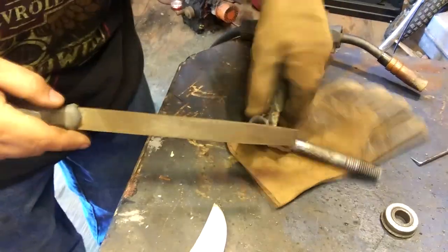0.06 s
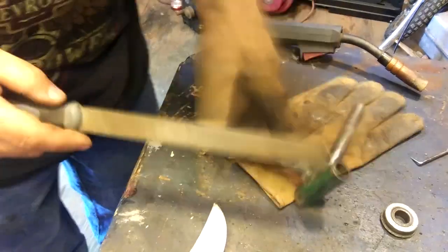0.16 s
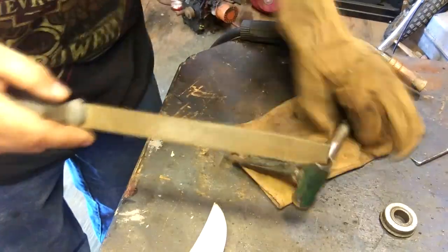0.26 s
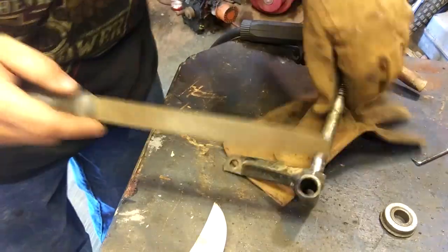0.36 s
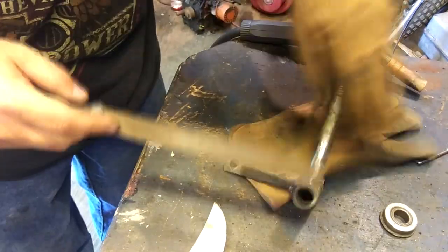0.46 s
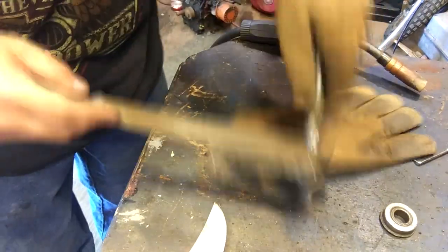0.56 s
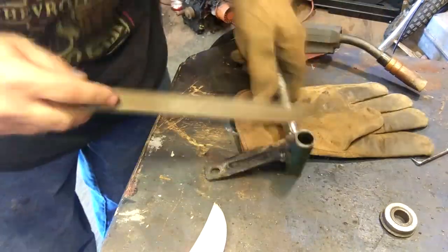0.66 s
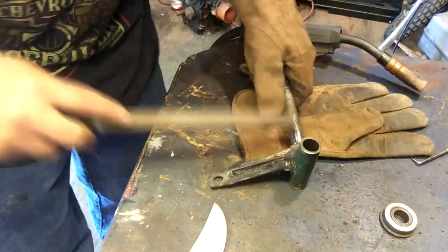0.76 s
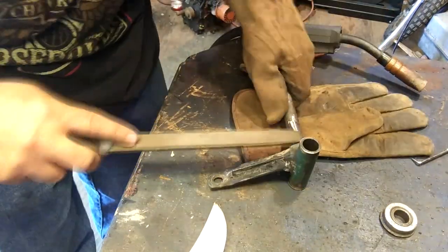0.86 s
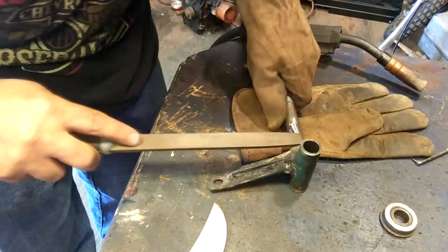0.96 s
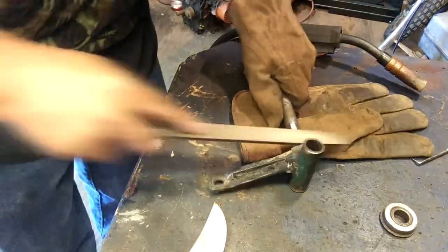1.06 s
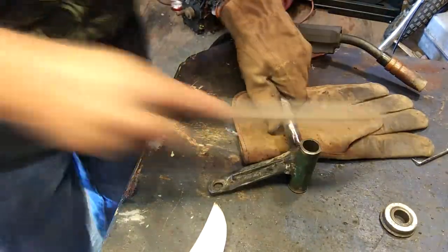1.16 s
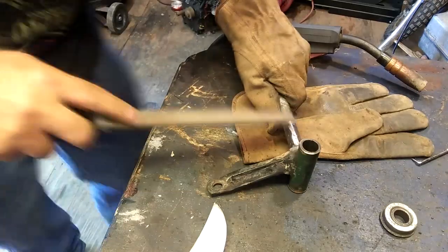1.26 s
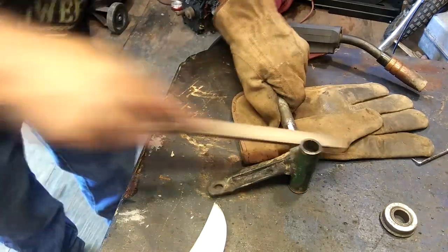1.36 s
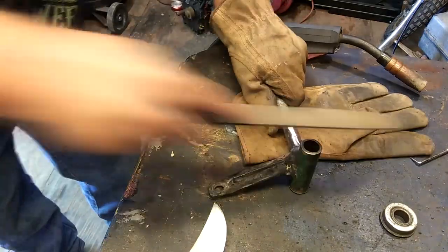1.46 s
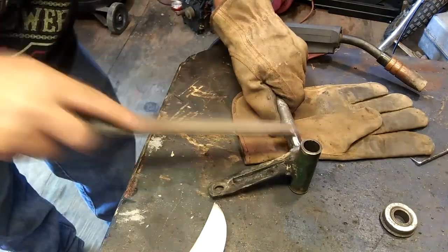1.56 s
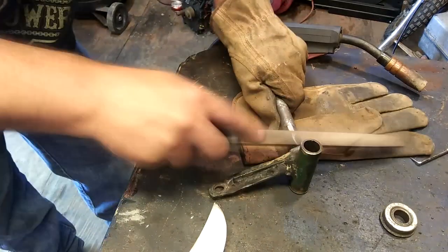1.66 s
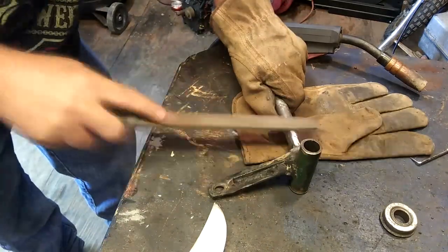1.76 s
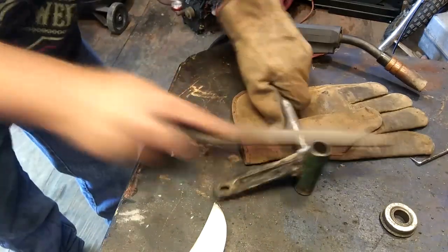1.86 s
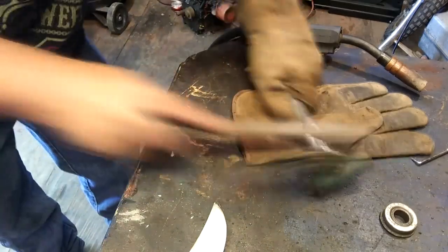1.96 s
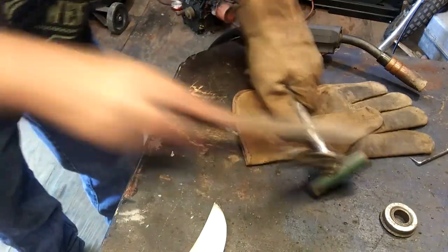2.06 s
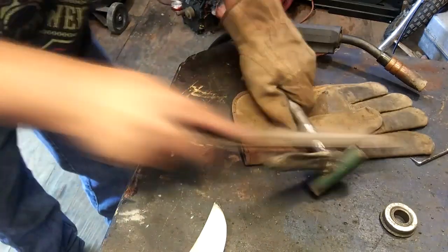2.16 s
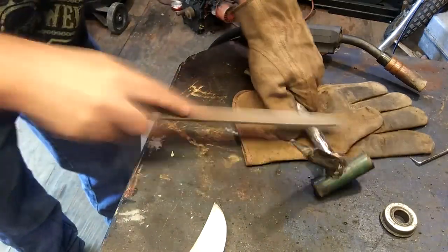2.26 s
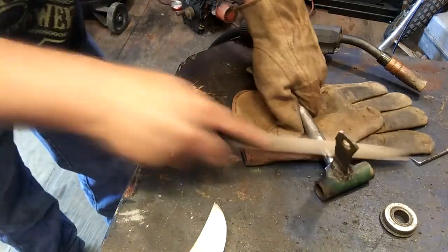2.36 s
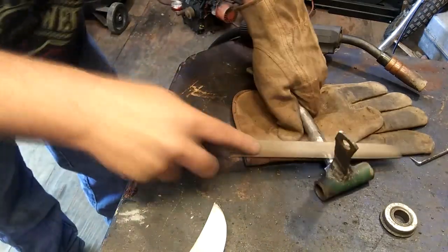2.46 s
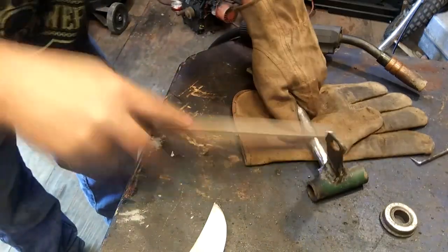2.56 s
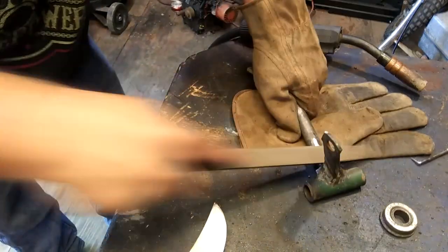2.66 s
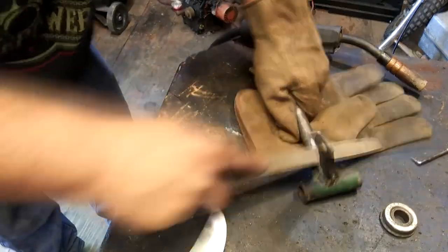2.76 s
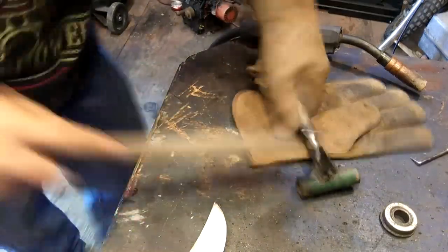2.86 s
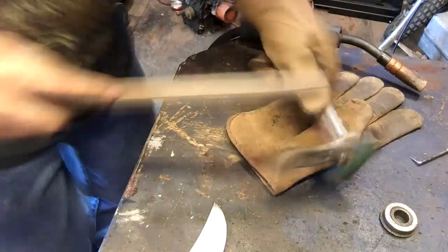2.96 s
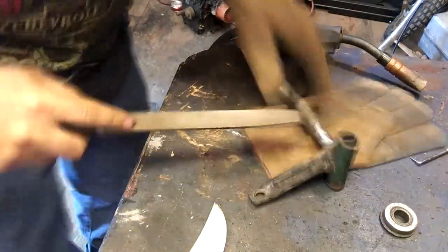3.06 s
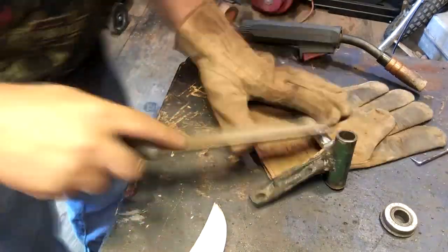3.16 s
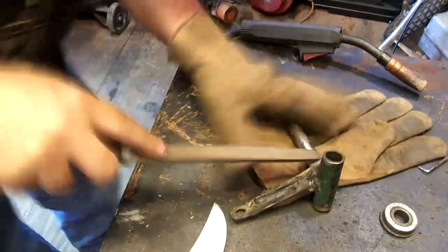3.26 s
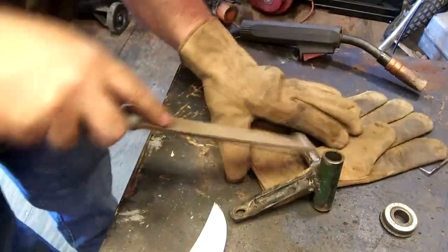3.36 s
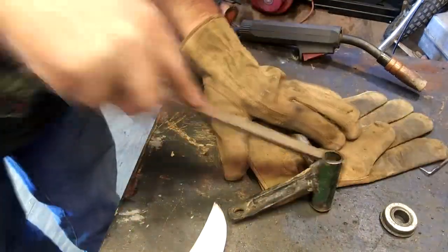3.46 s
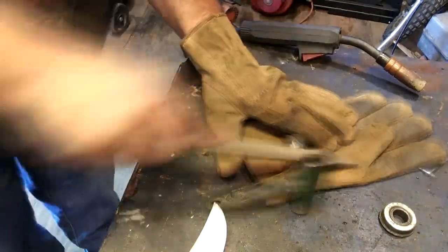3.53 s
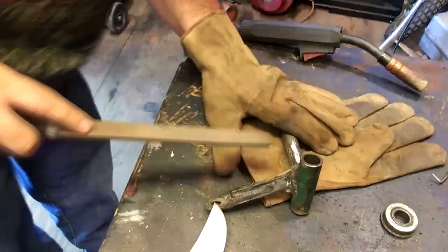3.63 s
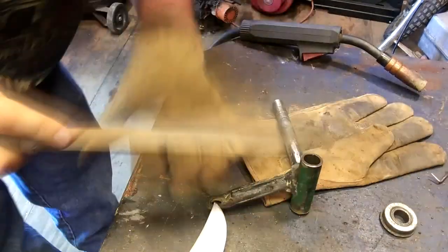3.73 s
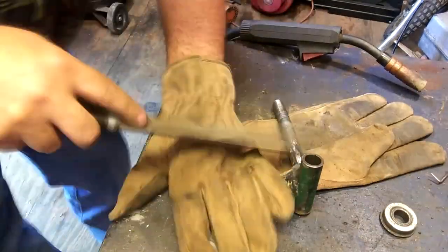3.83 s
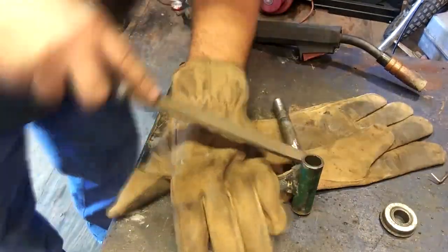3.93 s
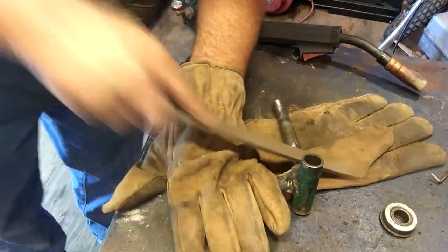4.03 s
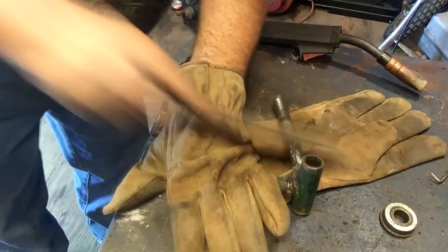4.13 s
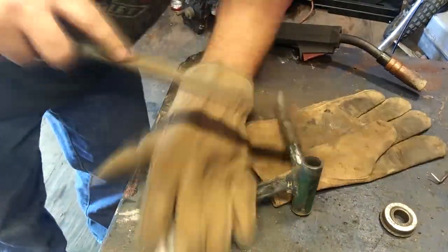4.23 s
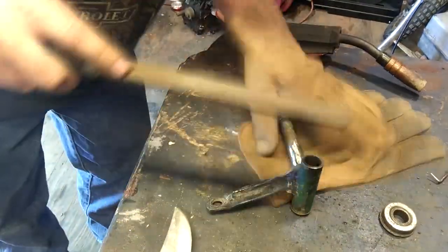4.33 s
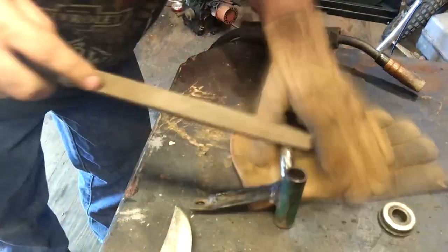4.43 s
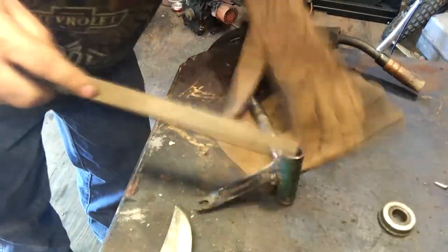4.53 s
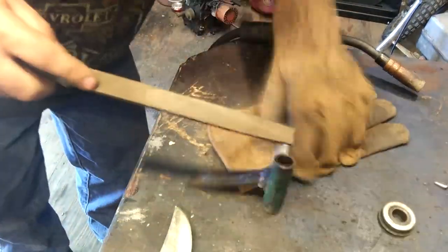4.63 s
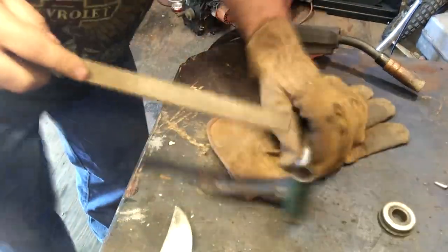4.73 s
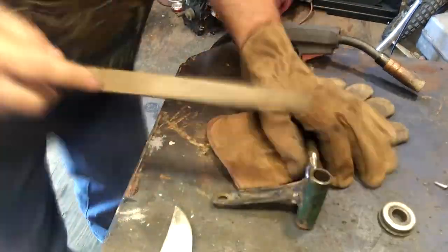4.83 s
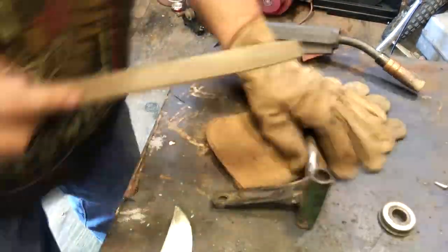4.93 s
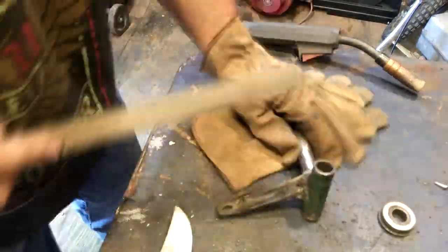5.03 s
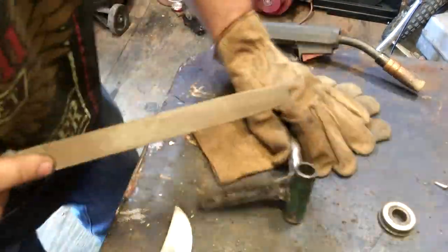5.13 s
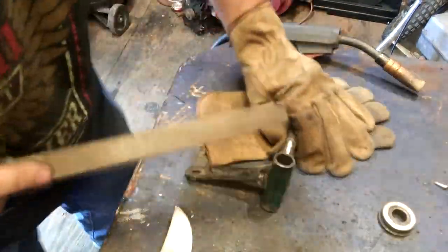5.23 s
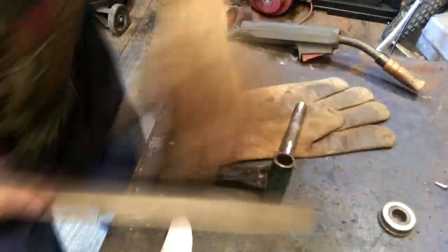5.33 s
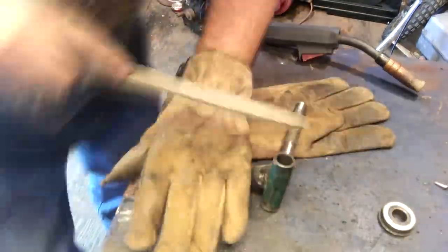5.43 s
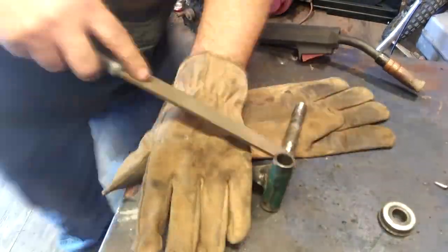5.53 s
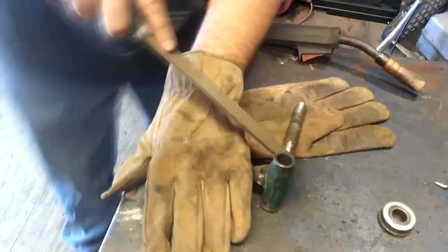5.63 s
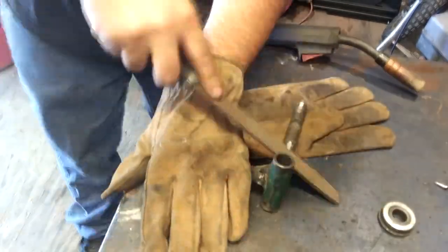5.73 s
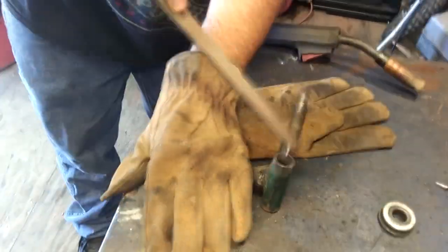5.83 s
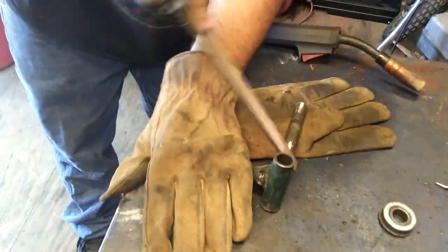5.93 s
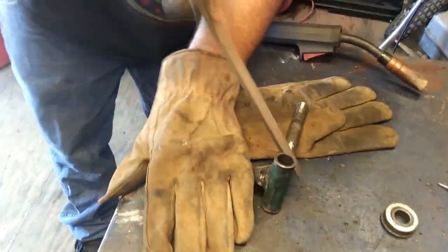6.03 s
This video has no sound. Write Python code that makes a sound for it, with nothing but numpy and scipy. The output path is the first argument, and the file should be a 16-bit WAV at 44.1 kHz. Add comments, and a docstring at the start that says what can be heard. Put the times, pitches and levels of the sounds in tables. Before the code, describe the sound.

Close mono sound of hand filing at a workbench. Hard set-downs come first, then gritty, hollow rasping with mid-range bench resonance and thin steel ring, speckled with bright clicks as teeth catch. The strokes pause for handling, return in short pairs, give way to soft scuffs and a dull knock, then a last few rasps. Quiet room, faint steady air, almost no bass.

```python
"""Hand filing of small steel part

A flat file rasps in quick, uneven strokes over a small steel part held on a gloved bench top.
Jerky tooth-slip noise drives resonances of bench, part, blade and teeth in each stroke, scuff and set-down.
Noise bursts make single tooth ticks; sines make deep thuds and faint steel rings; shaped noise is room tone.
Close mono microphone with little bass, in a quiet workshop."""
import sys
import numpy as np
from scipy import signal
from scipy.fft import rfft, irfft, next_fast_len
from scipy.io import wavfile
from scipy.ndimage import uniform_filter1d, map_coordinates

SR = 44100
rng = np.random.default_rng(int(sys.argv[2]) if len(sys.argv) > 2 else 0)


def dump(signal):
    """Clip the signal to [-1, 1] and save it as 16-bit WAV at the path in sys.argv[1]."""
    limited = np.clip(np.atleast_2d(signal).T, -1, 1)
    pcm = np.round(limited * 32767).astype(np.int16)
    wavfile.write(sys.argv[1], SR, pcm)


N = 268392  # samples
PAD = 32768  # samples of margin at each end

# Room tone spectrum: hz, relative_density_db
AIR_SPECTRUM = [(18, -49), (30, -31), (130, -17), (230, -18), (450, -11), (900, -3.5), (1100, -7),
                (3600, -19), (10200, -28.5), (15700, -30)]
# Part set down hard: peak_s, rise_ms, fall_ms, bench_db, bench_favoured_hz, thud_db
KNOCKS = [(.001, 16, 32.2, -15.5, 723, -58), (0.1723, 2.7, 37.7, -23.5, 696, -43),
          (.186, 4.8, 18, -16.5, 830, -79), (0.646, 4, 30.8, -17.5, 830, -43),
          (3.017, 6.5, 25, -15, 846, -43), (4.801, 8.8, 13, -18.5, 825, -32.5)]
# Faint thin rings of loose steel: peak_s, pitch_hz, level_db, rise_ms
RINGS = [(.015, 5310, -41, 22), (.362, 4300, -60, 13), (.515, 6050, -66, 25), (3.937, 1330, -35, 12)]
# Part scuffed and bumped over the glove: peak_s, rise_ms, fall_ms, bench_db, bench_favoured_hz, part_db
SCUFFS = [(0.092, 58, 20, -57.5, 770, -56.5), (.266, 14, 55.5, -54.5, 740, -48.5),
          (.341, 15, 33.4, -56, 650, -54.5), (.494, 17, 18, -66, 910, -57.5), (0.523, 4, 17, -49, 268, -51),
          (0.549, 59, 65, -63.5, 300, -60.5), (.639, 11, 21, -53, 460, -52),
          (0.713, 4.1, 47, -40, 940, -48), (.973, 47, 74, -52.5, 1030, -64),
          (2.909, 17, 28.3, -37.5, 420, -46), (3.05, 15, 46, -40.5, 870, -46),
          (3.104, 11.4, 6.7, -28, 835, -40), (3.118, 14, 17.6, -46, 890, -49),
          (3.332, 12.6, 19.4, -39.5, 840, -45.5), (3.726, 50, 8.7, -63.5, 1100, -68.5),
          (3.932, 7.9, 16.3, -32.5, 774, -36.5), (3.978, 36, 17, -54, 430, -53.5),
          (4.117, 15, 18.2, -41.5, 430, -52.5), (4.184, 16, 34.6, -45.5, 680, -43.5),
          (4.238, 3.5, 7.8, -34.5, 660, -44.5), (4.245, 23, 36.6, -42, 675, -48.5),
          (4.368, 13, 21, -57, 900, -48.5), (4.417, 32.3, 19, -44, 890, -47),
          (4.492, 29.6, 37.3, -41.5, 1080, -39.5), (4.574, 20, 16, -62, 900, -51.5),
          (4.643, 35.3, 31, -43.5, 720, -47.5), (4.748, 42, 24, -54.5, 920, -59.5),
          (4.814, 26, 22.2, -31.5, 570, -43), (4.883, 46, 35, -58, 1010, -56.5),
          (4.986, 25.4, 31.5, -44.5, 850, -44.5), (5.065, 17, 35, -53.5, 880, -59),
          (5.095, 13, 23, -46.5, 600, -44.5), (5.196, 19.5, 21, -38.5, 830, -47),
          (5.274, 22, 15, -66, 628, -68), (5.418, 2, 45, -63.5, 1010, -71),
          (5.486, 18.3, 18, -63, 935, -54.5), (5.612, 24, 49, -42.5, 474, -49.5),
          (5.66, 25, 22, -46, 560, -62), (5.775, 28, 34, -49, 444, -56.5), (5.863, 7.9, 18, -42, 410, -53)]
# Single teeth catching an edge: start_s, blade_peak_db, blade_favoured_hz, part_rel_blade_db, hiss_rel_blade_db
TICKS = [(.522, -49.5, 4320, 19, -18), (0.712, -37, 3840, -4, -4), (.81, -35.5, 3200, 0, -32.5),
         (.8565, -14.5, 3250, -8, -28), (.871, -21, 3260, -24, -26), (.877, -33, 3120, -24, -12),
         (.893, -26, 3300, -13, -15), (0.966, -41, 3340, -11, -9), (1.0097, -35, 3170, -3, -15),
         (1.168, -37, 3180, 16, -17.5), (1.3156, -16, 4500, -5, -30), (1.5802, -38, 4480, -16, -14),
         (1.5885, -13.5, 3000, -20, -18.5), (1.7544, -20.5, 3070, -15, -16), (1.7693, -17, 3040, -4, -15),
         (2.012, -15.5, 3440, -9, -38), (2.1448, -30, 3060, -11, -33), (2.606, -7, 2870, -13, -15),
         (3.0998, -37, 2960, 18.5, -26.5), (3.192, -21.5, 4370, -16, -16), (3.322, -40, 3060, -5, -25),
         (3.3678, -23, 4600, -13, -28), (3.395, -19.5, 3030, -17, -27), (3.606, -22, 4500, 5, -18),
         (3.8317, -28.5, 3970, -19, 4), (3.856, -16.5, 5440, -25, -13), (3.8686, -19.5, 5200, -21, -8),
         (3.9007, -37.5, 3200, 15, -20), (3.976, -30, 3000, -7, -13), (4.1547, -51, 3960, -7, 0),
         (4.1928, -31.5, 4220, -4, -4), (4.2354, -42, 3270, 17, -16), (4.4047, -45, 4300, -3, -2),
         (4.6318, -37, 3040, 11, -24), (4.6464, -36, 2920, 10.5, -23), (5.418, -53, 4900, -1, -8),
         (5.544, -19, 4700, -11, -22), (5.808, -40.5, 2840, 4, -4.5), (5.9103, -26.5, 3120, 1, -39.5),
         (5.9246, -35, 3160, -9, -32), (6.052, -23.5, 4600, 11, -18)]
# File strokes: peak_s, rise_ms, fall_ms, bench_db, bench_favoured_hz, blade_db, blade_favoured_hz
STROKES = [(.82, 5.1, 38, -46.5, 900, -51, 4300), (.886, 17.6, 15.6, -37, 950, -39.5, 3400),
           (1.06, 41, 45, -31.5, 900, -48, 4650), (1.124, 41, 32.5, -25.5, 885, -42.5, 4630),
           (1.165, 1.7, 35.4, -37, 340, -43, 3150), (1.335, 29, 15, -35, 890, -44, 4200),
           (1.395, 33.3, 28, -22.5, 940, -43, 4420), (1.427, 15, 26.4, -28.5, 900, -41, 4000),
           (1.589, 1.2, 17.5, -35, 1020, -38, 4800), (1.652, 34.4, 27.4, -19.5, 920, -33.5, 3070),
           (1.756, 2.2, 21, -34, 900, -34.5, 4470), (1.819, 26.4, 25.7, -20, 860, -31, 4260),
           (1.89, 11.3, 31.5, -20.5, 880, -26.5, 4100), (1.97, 14.7, 19.2, -26.5, 860, -36, 4200),
           (2.007, 19, 27.4, -31, 835, -32.5, 4300), (2.074, 18.4, 31, -32.5, 930, -28.5, 3130),
           (2.148, 11.3, 14, -52, 970, -31, 3060), (2.164, 9.5, 42.5, -33, 540, -48, 4290),
           (2.194, 25, 15.6, -33, 400, -37, 4230), (2.255, 15.6, 30.8, -26, 915, -26, 4230),
           (2.338, 19, 26.5, -27, 626, -27, 2820), (2.407, 24, 19.6, -26.5, 660, -30, 3000),
           (2.476, 36.7, 23.6, -27, 670, -34.5, 4360), (2.544, 17.5, 23.3, -25, 860, -29.5, 2920),
           (2.607, 16.7, 17, -36, 640, -25.5, 2950), (2.629, 40, 16.5, -26, 854, -45, 3040),
           (2.692, 18.6, 25.3, -23, 880, -32.5, 4180), (2.755, 19.7, 10.7, -22.5, 860, -36, 4200),
           (2.79, 20, 34, -29, 445, -40.5, 3210), (2.825, 15.8, 28, -26.5, 680, -23, 3150),
           (3.194, 18, 56, -40, 930, -41.5, 4400), (3.282, 51, 17.7, -42.5, 1010, -43.5, 4940),
           (3.369, 1.4, 12, -41, 905, -49, 4600), (3.4, 32.5, 21, -44, 910, -43, 3100),
           (3.506, 21.6, 28, -21, 910, -40, 4140), (3.584, 23.2, 26.4, -19.5, 676, -28, 4330),
           (3.843, 16.7, 61, -38.5, 626, -39, 5260), (4.051, 30.4, 29, -21.5, 890, -37.5, 4660),
           (5.538, 14.8, 29, -34.5, 910, -43, 4600), (5.717, 25.2, 25, -23, 950, -37.5, 4400),
           (5.912, 7.9, 29, -32.5, 860, -47.5, 3180), (5.999, 13.7, 19.8, -20.5, 980, -33, 3180),
           (6.05, 44, 58, -31, 474, -40, 3150)]
# Glove's hold on the work:
# time_s, extra_blade_ring_db, extra_part_db, extra_hiss_db, bench_centre_shift_octaves
HOLD = [(0, -6, -0.3, 1, -0.33), (.18, -9, 1.5, 1.2, -0.014), (.65, -5, 0.7, 0.2, -0.31),
        (.86, -6, -4, -4, 0.22), (1.12, 4, 1, 2.2, -0.19), (1.41, -.6, -0.3, 5, -0.23),
        (1.65, -3, 1, 3, 0.28), (1.9, 6, -1, -3.2, 0.3), (2.1, -12, 1.5, -0.8, -0.23),
        (2.4, -1, -4, .1, -0.11), (2.7, -1.5, -2.8, -2, 0.23), (3.02, 5, 0, -4, 0.27),
        (3.3, 1.2, 3.5, -2.5, -0.21), (3.5, 0, 0.7, 2.5, -0.24), (3.58, 0, 2, -2.5, 0.64),
        (3.9, 10, 1, 1, 0.074), (4.2, -10, -0.2, 2, 0.13), (4.5, -18, 0.3, 1.7, 0.2),
        (4.8, .1, -2, -1.3, 0.14), (5.2, -4, -0.5, 1, -0.041), (5.55, -5, 1.5, 2.5, -0.26),
        (6.09, 3, -2, -.6, 0.081)]
# Pitch the grip favours in the part: time_s, pitch_hz
PART_FAVOURED = [(0, 2260), (.19, 1290), (.65, 1370), (.86, 2100), (1.1, 1700), (1.4, 1900), (1.65, 2270),
                 (1.89, 1550), (2.07, 2260), (2.4, 1810), (2.6, 2280), (2.83, 1460), (3.02, 1320),
                 (3.2, 2280), (3.4, 1800), (3.51, 1330), (3.6, 1870), (3.84, 2020), (3.93, 1390),
                 (4.05, 1870), (4.8, 1860), (5.5, 1880), (5.72, 1650), (6.09, 1800)]
# Resonances before grip scatter and ringing offsets: centre_hz, width_hz, level_db
BENCH_MODES = [(260, 76, -4), (431, 34.5, -2), (570, 35, -25), (662, 60, -3), (760, 38, -8),
               (894.3, 32.5, 1.5), (1016.7, 67, -1.5)]
PART_MODES = [(1450, 580, 0), (1652, 89, 3.5), (1860, 53, 9), (2060, 270, 1), (2257, 55, 7),
              (2482, 500, -0.5)]
BLADE_MODES = [(3150, 140, 5.5), (3340, 120, -1.5), (4134, 250, -3), (4273, 140, -6), (4410, 230, -1),
               (4780, 120, -0.5), (5180, 1300, -8.5), (5850, 260, -21)]
TEETH_MODES = [(8150, 870, -5.5), (9300, 210, -0.5), (10200, 260, -4.5), (12000, 280, -4.5),
               (13400, 300, -4.5), (14900, 150, -29)]
# Broad radiation under the resonances: hz, relative_density_db
BENCH_WIDE = [(100, -30.5), (200, -0.5), (420, -4), (950, -9), (1150, -22.5), (1400, -37.5)]
PART_WIDE = [(900, -10.5), (1200, -6), (1900, -8), (2700, -16.5), (3200, -29)]
BLADE_WIDE = [(2300, -43.5), (2800, -16), (3700, -17), (4500, -16), (6500, -23), (7800, -55.5)]
TEETH_WIDE = [(5500, -63.5), (6700, -14), (10000, -14.5), (15700, -23.5)]

AIR_DB, TOP_HZ = -62.5, 15725
GRIP_SCATTER_DB, GRIP_SCATTER_SHARE = 3, 0.016  # std. dev. of mode level, of mode pitch

# Stroke: part level lies between bench and blade
PART_BENCH_SHARE, STROKE_PART_DB, STROKE_HISS_REL_BLADE_DB = 0.46, -3.5, -19
SCUFF_BLADE_REL_PART_DB, SCUFF_HISS_REL_PART_DB = -7, -18.5
KNOCK_REL_BENCH_DB = np.array((-11, -19.5, -29))  # part, blade, hiss

# Freedom to ring: part_db, blade_db
STROKE_RING_DB, SCUFF_RING_DB, KNOCK_RING_DB = (20.5, 10.7), (1.6, 4.4), (-5, -6)
RING_GROWTH_DB_PER_DB = 0.37  # by blade level over bench level
UPPER_BLADE_HZ, UPPER_RING_DB = 3700, 1.5  # strokes favouring upper blade modes ring more

# Bench loudness centre, for a favoured pitch of 800 Hz and before hold and depth shifts
CENTRE_AT_800_HZ, CENTRE_FOLLOW_POWER = 721, 0.12
KNOCK_CENTRE_SHARE, SCUFF_CENTRE_SHARE = 0.99, 0.79  # deeper than under a stroke
SAG_OCTAVES = 0.14  # centre above its mean early in a contact, below it late
LOOSE_BLADE_HZ = 3830  # blade only resting on the work
THUD_LAG_S, TICK_T60_MS = 0.0029, 18


def amp(db):
    """Decibels to gain."""
    return 10 ** (np.asarray(db) / 20)


def unit(x):
    """Scale to rms 1."""
    return x / np.sqrt(np.mean(np.abs(x) ** 2) + 1e-20)


def along(points, hz):
    """(hz, db) points, interpolated on a log-frequency axis, as gain."""
    point_hz, point_db = np.transpose(points)
    return amp(np.interp(np.log(hz + 1), np.log(point_hz + 1), point_db, left=-120, right=-120))


def wobble(rate_hz, size):
    """Smooth random curve with rate_hz knots a second."""
    knots = rng.standard_normal(int(size * rate_hz / SR) + 4)
    return map_coordinates(knots, [np.arange(size) * rate_hz / SR])


def swell(t, rise, fall):
    """Bell-shaped effort around t = 0."""
    return np.exp(-(t / np.where(t < 0, rise, fall)) ** 2)


def lean(hz, centre_hz, spread):
    """Bell on the log-frequency axis."""
    return np.exp(-.5 * (np.log((hz + 1) / centre_hz) / spread) ** 2)


def body(hz, modes, wide, ring_db, favoured_hz, reach):
    """Broad radiation plus resonances; grip scatters them, contact point favours those near one pitch."""
    centre_hz, width_hz, level_db = np.transpose(modes)[:, :, None]
    level_scatter, pitch_scatter = rng.standard_normal((2, len(centre_hz), 1))
    level_db = level_db + ring_db + 8 * lean(centre_hz, favoured_hz, reach) + GRIP_SCATTER_DB * level_scatter
    centre_hz = centre_hz * (1 + GRIP_SCATTER_SHARE * pitch_scatter)
    resonance = hz * width_hz / (centre_hz ** 2 - hz ** 2 + 1j * hz * width_hz)
    peaks = amp(level_db) * np.abs(resonance) ** 2
    return np.sqrt(along(wide, hz) ** 2 + np.sum(peaks ** 2, axis=0))  # unrelated paths add in power


def add(out, time_s, shape, force, voices):
    """Mix force through each (level_db, response) under one shape, window centred on time_s."""
    start = round(time_s * SR) + PAD - len(shape) // 2
    for level_db, response in voices:
        shake = shape * irfft(force * response, len(shape))
        match = np.sqrt(np.sum(shape ** 2) / np.sum(shake ** 2))  # equal energy to shape
        out[start:][:len(shape)] += amp(level_db) * match * shake


def block_axes(size):
    """Frequency axis in Hz and centred time axis in ms."""
    return np.fft.rfftfreq(size, 1 / SR), (np.arange(size) - size // 2) / SR * 1000


def highpass(x, order, cutoff_hz):
    """Butterworth high-pass."""
    return signal.sosfilt(signal.butter(order, cutoff_hz, "high", fs=SR, output="sos"), x)


def air():
    """Workshop room tone: shaped noise, gently unsteady."""
    size = next_fast_len(N)
    spectrum = rfft(rng.standard_normal(size)) * along(AIR_SPECTRUM, np.fft.rfftfreq(size, 1 / SR))
    tone = irfft(spectrum, size)[:N]
    return amp(AIR_DB + 2.0 * wobble(36, N) + 1.4 * wobble(4.6, N)) * unit(tone)


# Contact rows: peak_s, rise_ms, fall_ms, bench_hz, bench_centre_share, blade_hz,
# (bench_db, part_db, blade_db, hiss_db), (part_ring_db, blade_ring_db)
def knocks():
    """Contact rows of set-downs: bench dominates, steel is damped."""
    return [(s, rise_ms, fall_ms, bench_hz, KNOCK_CENTRE_SHARE, LOOSE_BLADE_HZ,
             (bench_db, *(bench_db + KNOCK_REL_BENCH_DB)), KNOCK_RING_DB)
            for s, rise_ms, fall_ms, bench_db, bench_hz, _ in KNOCKS]


def thuds():
    """One slow push of the bench top for each set-down: a brief 55 Hz sine pulse."""
    t = np.arange(N) / SR
    out = np.zeros(N)
    for s, *_, level_db in KNOCKS:
        push = swell(t - s - THUD_LAG_S, 0.0041, 0.0011)
        out += amp(level_db) * push * np.sin(2 * np.pi * 55 * (t - s))
    return out


def rings():
    """Loose steel: short steady sines that fade in and out."""
    t = np.arange(N) / SR
    out = np.zeros(N)
    for s, pitch_hz, level_db, rise_ms in RINGS:
        fade = swell(t - s, rise_ms / 1000, rise_ms / 700)  # fall is longer than rise
        out += amp(level_db) * fade * np.sin(2 * np.pi * pitch_hz * t)
    return out


def scuffs():
    """Contact rows of the part rubbing the glove: blade and hiss follow the part."""
    return [(s, rise_ms, fall_ms, bench_hz, SCUFF_CENTRE_SHARE, LOOSE_BLADE_HZ,
             (bench_db, part_db, part_db + SCUFF_BLADE_REL_PART_DB, part_db + SCUFF_HISS_REL_PART_DB),
             SCUFF_RING_DB)
            for s, rise_ms, fall_ms, bench_db, bench_hz, part_db in SCUFFS]


def ticks():
    """Tooth catches: sudden start, quick decay in part, blade and teeth; too light to move the bench."""
    size = 8192
    hz, t_ms = block_axes(size)
    out = np.zeros(N + 2 * PAD)
    onset = np.clip(t_ms / 0.56, 0, 1)
    ring = amp(-60 * np.abs(t_ms) / TICK_T60_MS)
    crack = 1.22 * amp(-60 * np.abs(t_ms) / 4)
    shape = onset * (ring + crack)
    for s, peak_db, blade_hz, part_rel_db, hiss_rel_db in TICKS:
        part = body(hz, PART_MODES, PART_WIDE, 7.0, 2200, reach=0.22)
        blade = body(hz, BLADE_MODES, BLADE_WIDE, -17.5, blade_hz, reach=0.11)
        blade = blade * lean(hz, blade_hz, spread=0.88)
        level_db = peak_db - 10.5  # rms lies below the peak
        voices = ((level_db, blade), (level_db + part_rel_db, part),
                  (level_db + hiss_rel_db, along(TEETH_WIDE, hz)))
        add(out, s, shape, rfft(rng.standard_normal(size)), voices)
    return highpass(out[PAD:PAD + N], 4, 500)


def strokes():
    """Contact rows of file strokes: steel rings more freely as the blade stands out over the bench."""
    rows = []
    for s, rise_ms, fall_ms, bench_db, bench_hz, blade_db, blade_hz in STROKES:
        part_db = PART_BENCH_SHARE * bench_db + (1 - PART_BENCH_SHARE) * blade_db + STROKE_PART_DB
        levels_db = bench_db, part_db, blade_db, blade_db + STROKE_HISS_REL_BLADE_DB
        upper_db = UPPER_RING_DB * (blade_hz > UPPER_BLADE_HZ)
        ring_db = np.array(STROKE_RING_DB) + RING_GROWTH_DB_PER_DB * (blade_db - bench_db) + [0, upper_db]
        rows.append((s, rise_ms, fall_ms, bench_hz, 1, blade_hz, levels_db, ring_db))
    return rows


def rasp():
    """Jerky force of teeth that catch and slip at random, in clumps of shifting colour."""
    size = N + PAD + 512
    noise = signal.stft(rng.standard_normal(size), nperseg=256)[2]
    clumps = uniform_filter1d(rng.standard_normal(noise.shape), size=4, axis=0)  # over frequency
    clumps = uniform_filter1d(clumps, size=5, axis=1)  # over time
    grit = signal.istft(noise * amp(1.64 * unit(clumps)), nperseg=256)[1][:size]
    jerk_db = 1.45 * wobble(70, size) + 1.56 * wobble(220, size) + 1.6 * wobble(900, size)
    return amp(jerk_db) * grit


def contacts():
    """Each contact's one force drives all four bodies; the light bench radiates little deep bass."""
    out, slips = np.zeros(N + 2 * PAD), rasp()
    held_s, *held = np.transpose(HOLD)
    for s, rise_ms, fall_ms, bench_hz, centre_share, blade_hz, levels_db, ring_db in strokes() + scuffs() + knocks():
        bench_db, part_db, blade_db, hiss_db = levels_db
        part_ring_db, blade_ring_db = ring_db
        freer_db, part_up_db, hiss_up_db, shift_octaves = [np.interp(s, held_s, column) for column in held]
        steel_ring_db = blade_ring_db + freer_db
        size = 4096 * int(1 + max(rise_ms, fall_ms) // 18)
        hz, t_ms = block_axes(size)
        force = rfft(slips[rng.integers(N):][:size])
        centre_hz = CENTRE_AT_800_HZ * (bench_hz / 800) ** CENTRE_FOLLOW_POWER
        centre_hz *= centre_share * 2 ** shift_octaves
        part_hz = np.interp(s, *np.transpose(PART_FAVOURED))
        shape = swell(t_ms, rise_ms, fall_ms)
        later = .5 + .5 * np.tanh(t_ms / (rise_ms + fall_ms) * 4)
        # colour crossfades from first half to second
        for share, sag_octaves in ((1 - later, SAG_OCTAVES), (later, -SAG_OCTAVES)):
            bench = body(hz, BENCH_MODES, BENCH_WIDE, -0.45, bench_hz, reach=0.087)
            bench = bench * lean(hz, centre_hz * 2 ** sag_octaves, spread=0.67)
            part = body(hz, PART_MODES, PART_WIDE, part_ring_db - 18.5, part_hz, reach=0.036)
            blade = body(hz, BLADE_MODES, BLADE_WIDE, steel_ring_db - 18, blade_hz, reach=0.06)
            blade = blade * lean(hz, blade_hz, spread=1.7)
            teeth = body(hz, TEETH_MODES, TEETH_WIDE, steel_ring_db - 22.5, 6000, reach=0.4)
            voices = ((bench_db, bench), (part_db + part_up_db, part),
                      (blade_db, blade), (hiss_db + hiss_up_db, teeth))
            add(out, s, shape * share, force, voices)
    return highpass(out[PAD:PAD + N], 2, 130)


def scene():
    """One microphone feeds both channels."""
    return np.tile(air() + contacts() + thuds() + rings() + ticks(), (2, 1))


def record(dry):
    """Sound fades in over the first 3 ms and fades out just before the end; nothing is kept from TOP_HZ up."""
    t, size = np.arange(N) / SR, next_fast_len(N + 4096)
    opening = t / .003
    closing = (t[-1] - t) / .001 - 2
    gate = np.clip(np.minimum(opening, closing), 0, 1)
    in_band = np.fft.rfftfreq(size, 1 / SR) < TOP_HZ
    return irfft(rfft(dry * gate, size) * in_band, size)[:, :N]


dry = scene()
out = record(dry)
dump(out)
```